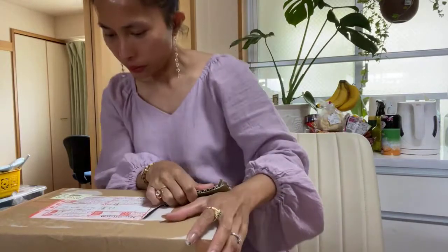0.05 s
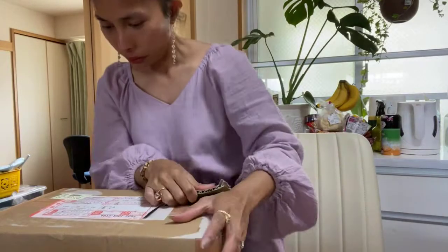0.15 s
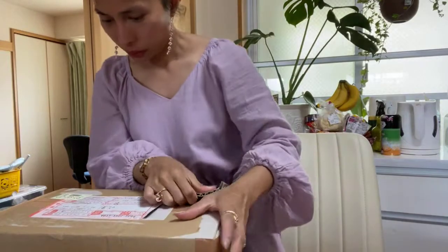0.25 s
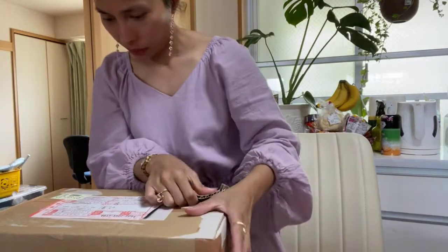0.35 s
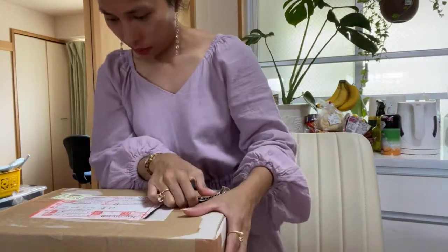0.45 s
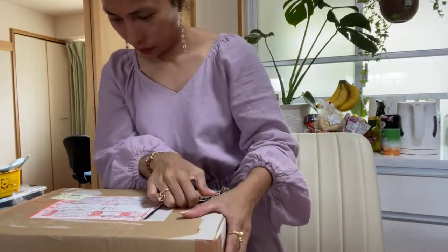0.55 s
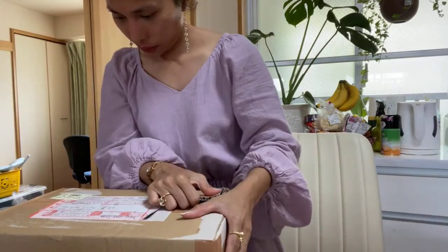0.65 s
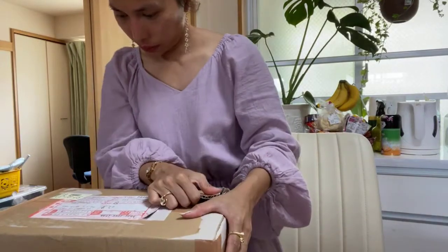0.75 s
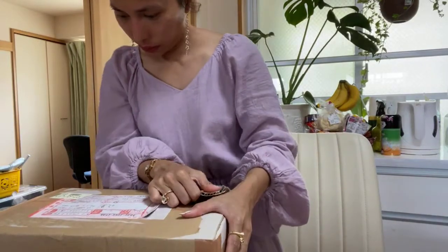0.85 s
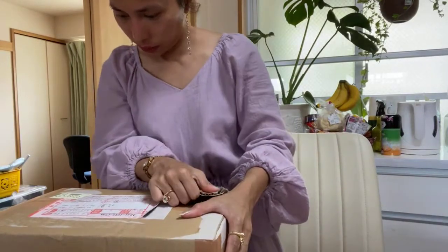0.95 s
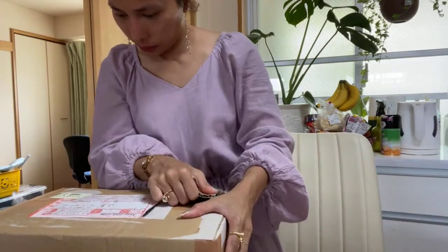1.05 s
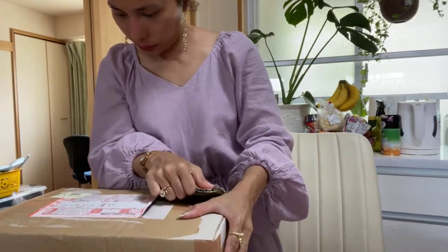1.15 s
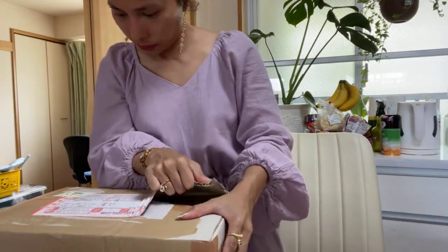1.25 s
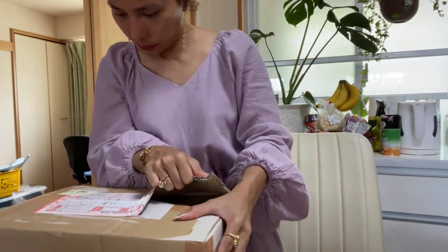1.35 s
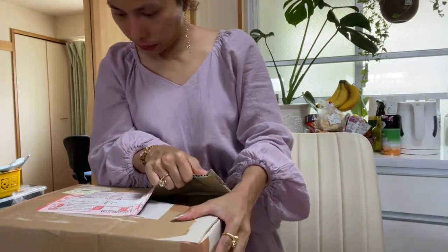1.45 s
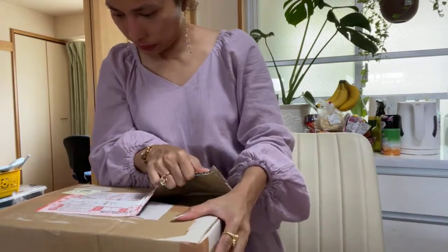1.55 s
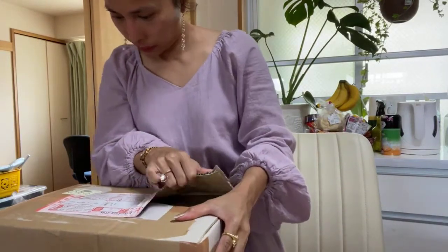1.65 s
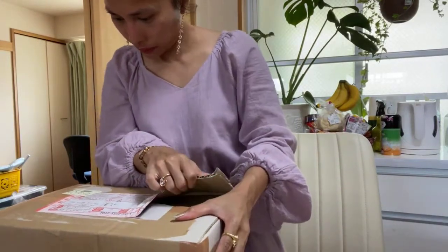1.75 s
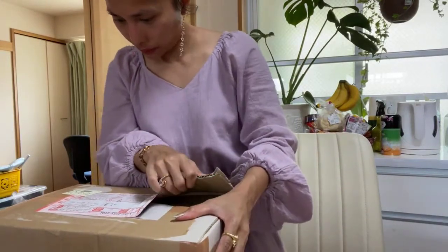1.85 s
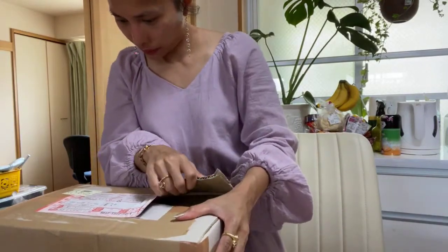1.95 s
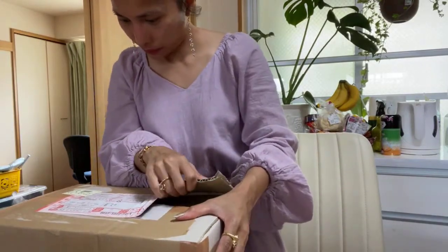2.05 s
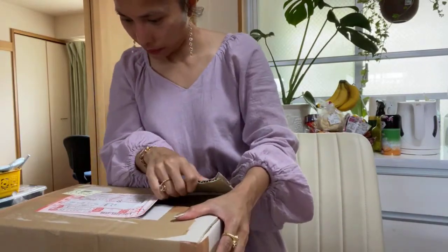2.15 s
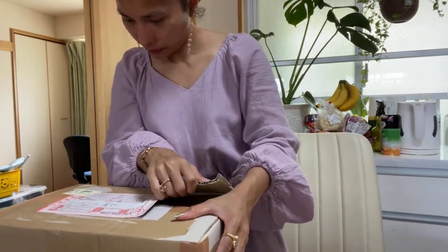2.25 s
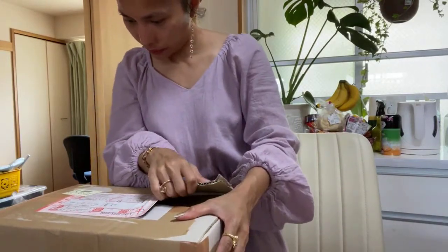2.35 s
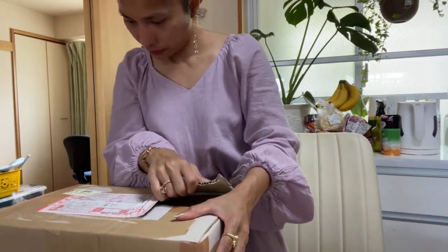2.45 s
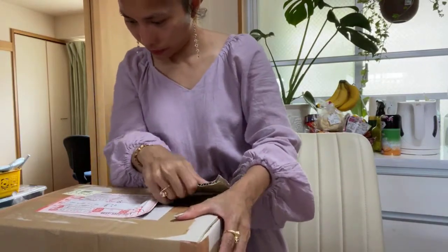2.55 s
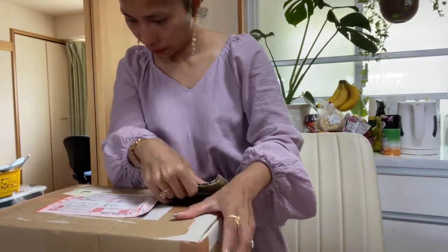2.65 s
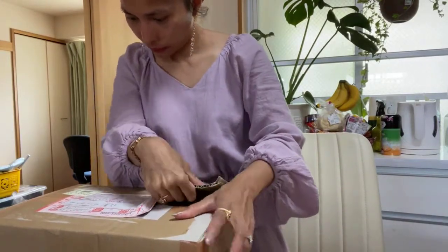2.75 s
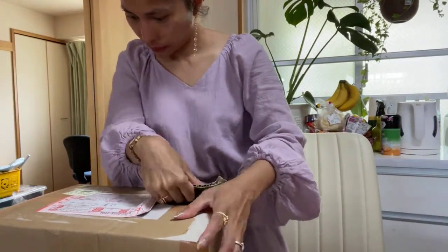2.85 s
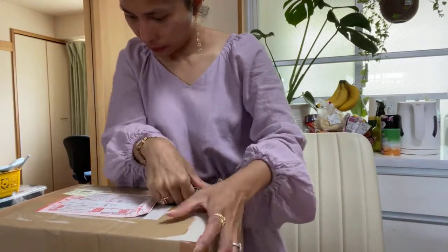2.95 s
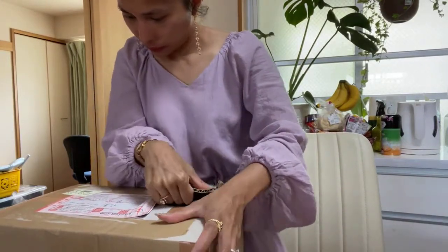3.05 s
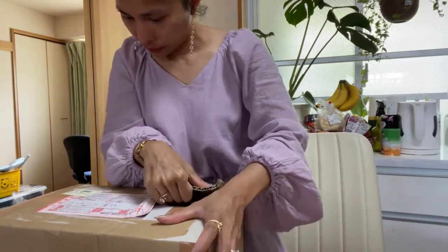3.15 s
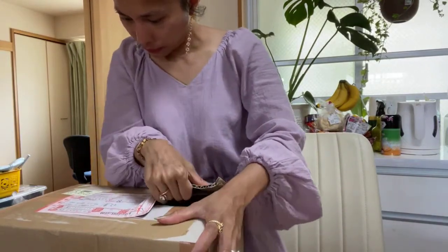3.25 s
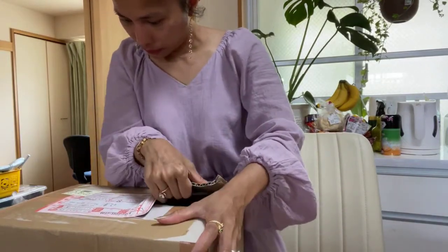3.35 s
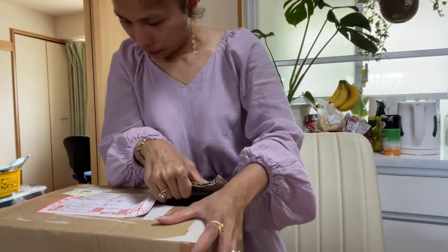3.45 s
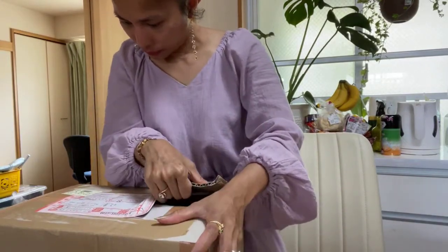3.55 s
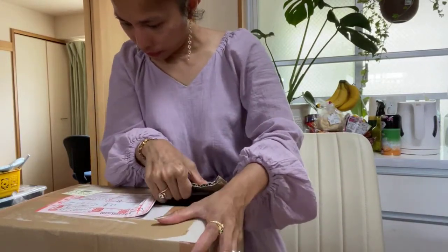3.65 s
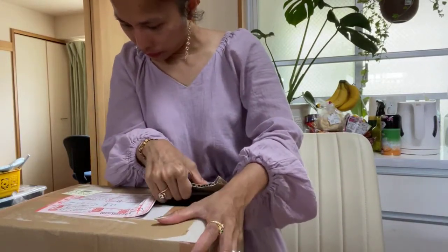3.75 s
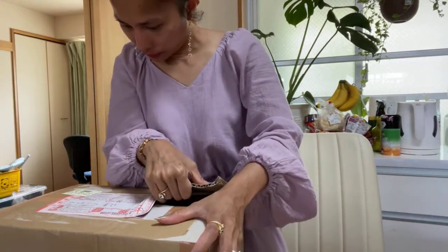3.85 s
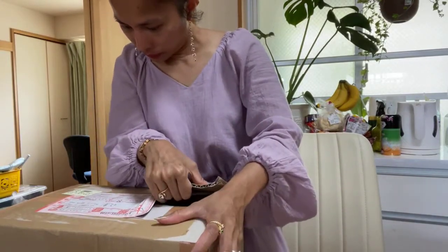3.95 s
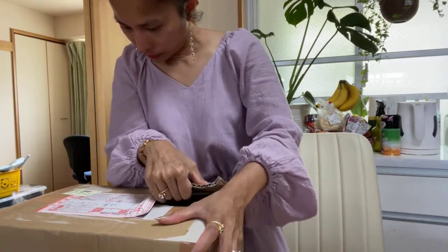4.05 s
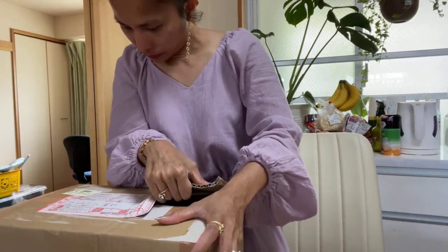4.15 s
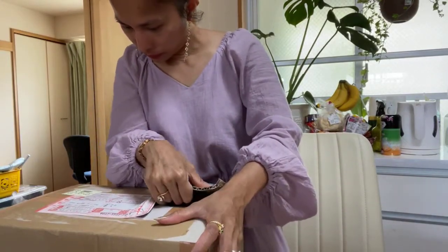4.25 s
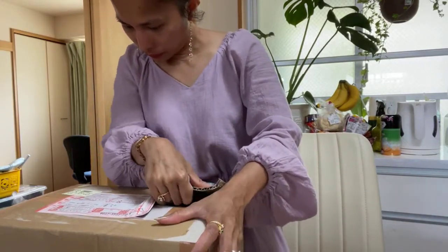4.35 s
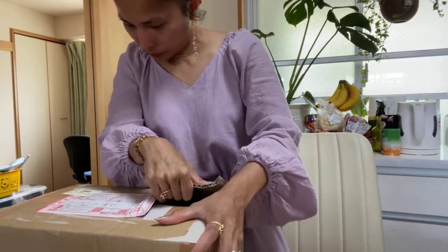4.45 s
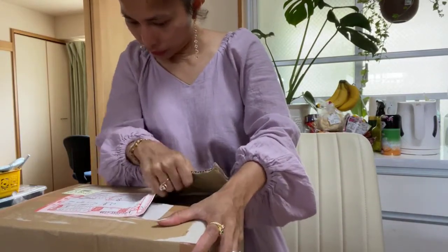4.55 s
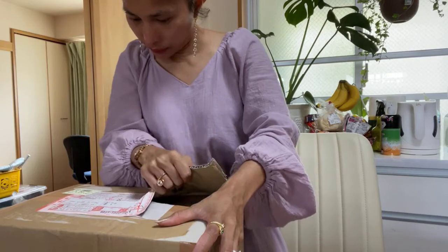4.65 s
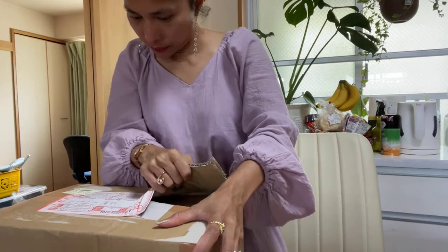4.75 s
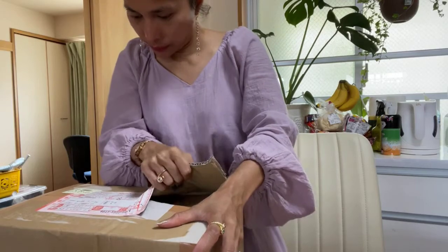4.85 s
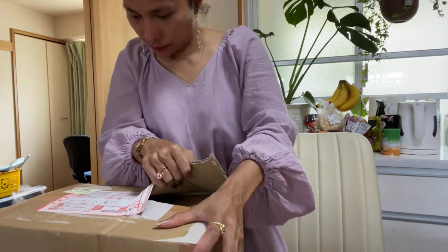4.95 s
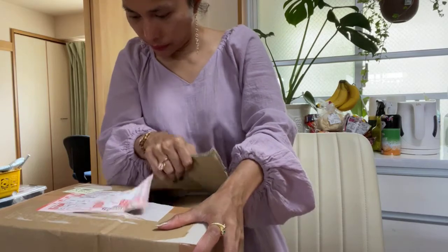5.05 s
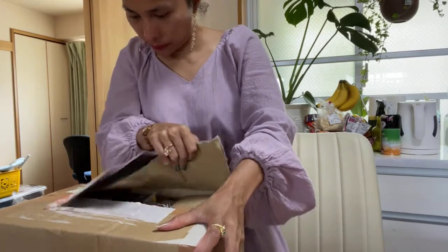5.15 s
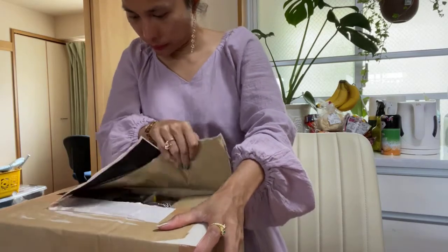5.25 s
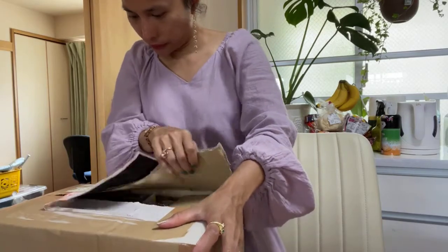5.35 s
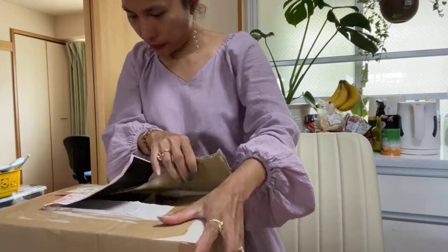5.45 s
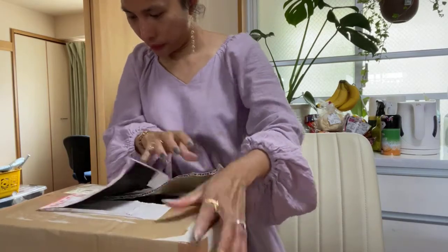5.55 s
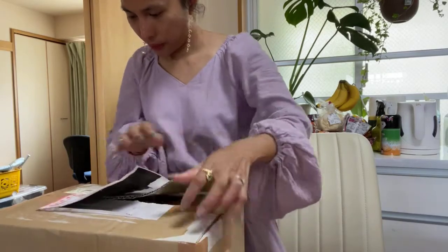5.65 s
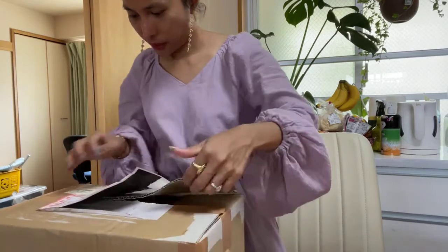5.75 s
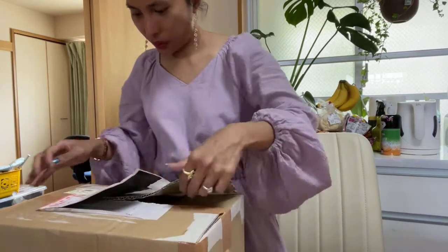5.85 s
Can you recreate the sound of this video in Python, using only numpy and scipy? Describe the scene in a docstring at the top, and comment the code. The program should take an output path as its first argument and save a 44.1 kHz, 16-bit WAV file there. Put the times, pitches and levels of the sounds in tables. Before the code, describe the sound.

Close, dry recording in a small quiet room. Hands softly rub and tick on a cardboard box, then stuck tape lets go in a rapid run of sharp snaps with woody board knocks. Faint scuffs, taps and near quiet follow, before separate cracks speed into a short loud rip with a boxy thud, then rustling and papery ticks.

```python
"""A small room: tape is pulled off a cardboard box, and its glue lets go in single snaps, then in one fast rip.
A snap is a burst of noise spikes plus the damped modes of the board; the rip is dense grains and noise.
Between pulls, hands rub (coloured noise), tick, scuff and bump the box (short bursts and dying modes), and
a flap groans (a wavering tone). Early echoes, a decaying tail and low room tone surround the sounds."""
import sys
import numpy as np
from scipy import signal
from scipy.io import wavfile
from scipy.ndimage import uniform_filter1d

SR = 44100
rng = np.random.default_rng(int(sys.argv[2]) if len(sys.argv) > 2 else 0)


def put_to_file(sound):
    """Save the sound as 16-bit audio at rate SR, in the file named by the first command-line argument."""
    columns = np.atleast_2d(sound).T  # one column per channel
    safe = np.clip(columns, -1, 1)
    whole_steps = np.round(safe * 32767)
    wavfile.write(sys.argv[1], SR, whole_steps.astype(np.int16))


N = 259308

# nominal bending modes of the cardboard: f/Hz, level/dB, t60/s
BOARD_MODES = [(138, -13.5, 0.02), (256, -23, 0.01), (353, -8, 0.041), (444, -4, 0.019), (503, -5.5, 0.018),
               (583, -1.5, 0.012), (672, 3.5, 0.012), (790, -4.5, 0.012), (1010, -6.5, 0.0053),
               (1410, -8.5, 0.0038), (1610, -4, 0.01), (2100, -11.5, 0.008)]
BURST = 24.9  # samples over which a crack's level counts


def gain_of(db):
    """Amplitude ratio from a level: 20 dB for each factor of ten."""
    return 10 ** (np.asarray(db) / 20)


def evened(x):
    """Normalisation to a root-mean-square value of 1."""
    return x / np.sqrt(np.mean(x ** 2) + 1e-20)


def peaked(x):
    """Normalisation to a peak magnitude of 1."""
    return x / abs(x).max()


def read(points, hz):
    """Interpolation along a logarithmic frequency axis."""
    f, value = np.transpose(points)
    return np.interp(np.log(hz + 1), np.log(f + 1), value)


def add(mix, s, sound):
    """Linear superposition of a sound that starts at s seconds."""
    part = mix[round(s * SR):][:len(sound)]
    part += sound[:len(part)]


def follow(rows, lead=0.016):
    """Envelope control: a mask fading in from lead seconds before the start and out past the end, and the curves."""
    s, *columns = np.transpose(rows)
    t = np.arange(N) / SR
    to_edge = np.minimum(t - s[0] + lead, s[-1] + 0.014 - t)
    mask = np.sqrt(np.clip(to_edge / 0.012, 0, 1))
    return mask, *(np.interp(t, s, c) for c in columns)


def colour(x, points):
    """Minimum-phase filtering: the log spectrum fixes the phase, so the response is causal; its energy is 1."""
    level_db = np.maximum(read(points, abs(np.fft.fftfreq(2048, 1 / SR))), -70)
    log_gain = np.log(gain_of(level_db))
    taps = np.fft.ifft(np.exp(np.conj(signal.hilbert(log_gain)))).real[:1024]
    return signal.oaconvolve(x, taps / np.linalg.norm(taps))[:len(x)]


def patchy(x, depth_db, frames, bins):
    """Time-frequency modulation: random patches of time and pitch swell and sink at constant mean power."""
    z = signal.stft(x, nperseg=128, noverlap=96)[2]
    field = rng.standard_normal(z.shape[::-1]).T
    field = uniform_filter1d(field, frames, 1)
    field = evened(uniform_filter1d(field, bins, 0))
    return signal.istft(z * evened(gain_of(depth_db * field)), nperseg=128, noverlap=96)[1][:len(x)]


def ring(hz, t60, rise=0.0007, delay=0):
    """Damped oscillation: one mode with a soft start and exponential decay."""
    t = np.maximum(np.arange(SR // 6) / SR - delay, 0)
    return gain_of(-60 * t / t60) * (1 - np.exp(-t / rise)) * np.sin(2 * np.pi * hz * t)


def board(detune=1, spread_db=0):
    """Modal superposition with dispersion: bending waves of high pitch travel faster, so high modes start first."""
    hz, level_db, t60 = np.transpose(BOARD_MODES)
    travel_s = 0.001  # crossing time of a 1 kHz bending wave over the lid
    total = 0
    for k, (f, db, decay_s) in enumerate(zip(hz * detune, level_db + spread_db, t60)):
        mode = ring(f, decay_s, rise=0.25 / f, delay=travel_s * np.sqrt(1000 / f))
        total = total + (-1) ** k * gain_of(db) * mode
    return total


def stir(x):
    """Modal overlap: steady friction moves over the board, so its modes blur into one smooth colour."""
    # board under friction: f/Hz, relative level/dB
    spectrum = [(150, -28.5), (300, 4), (700, -6), (1200, -5), (2000, -9.5), (4000, -31.5)]
    return colour(x, spectrum)


def grains(per_s, spread_db):
    """Shot noise: sparse clicks of random sign, a few of them large."""
    size = gain_of(spread_db * np.minimum(rng.exponential(1, N), 4)) * rng.choice([-1., 1.], N)
    return evened(size * (rng.random(N) < per_s / SR))


def crack(chance, t60, lag, dull=0.75):
    """Impulsive fracture: sharp spikes as fibres part, then their bounce off the lid with a few late fibres."""
    t = np.arange(chance.shape[1]) / SR
    spikes = chance * abs(chance) ** 0.55
    first, late = spikes * gain_of(-60 * t / t60) * np.minimum(t / 0.00035, 1)
    pole = np.clip(dull, 0, 0.9)  # one-pole low-pass
    bounce = signal.lfilter([1 - pole], [1, -pole], first + 0.71 * late)
    both = first + 0.75 * np.roll(bounce, round(lag * SR)) * (t > lag)
    return both / np.linalg.norm(both) * np.sqrt(BURST)


def paper(hz):
    """Impulsive fracture: one small crack, its spectral peak set by the bit of paper that gives."""
    shape = [(800, -24), (0.7 * hz, -10), (hz, 0), (1.35 * hz, -9), (17000, -20)]
    return colour(crack(rng.standard_normal((2, 700)), 0.0027, 0.0012, dull=0), shape)


def room_tone():
    """Stationary Gaussian noise: a low steady spectrum with drifting patches."""
    # room tone: f/Hz, relative spectral density level/dB
    spectrum = [(15, -47), (25, -7), (70, 0.5), (177, -0.5), (296, -9.5), (358, -3.5), (422, -13),
                (787, -14), (1320, -21.5), (1830, -31), (3230, -32), (11900, -44), (16500, -52.5)]
    level_db, patch_db = -67, 1.5
    frames, hz = N // 256 + 5, np.fft.rfftfreq(1024, 1 / SR)
    a, b, patches = rng.standard_normal((frames, 513, 3)).T
    patches = uniform_filter1d(patches, 10, 0)
    patches = evened(uniform_filter1d(patches, 14, 1))
    z = (a + 1j * b) * gain_of(read(spectrum, hz)[:, None] + patch_db * patches)
    return gain_of(level_db) * evened(signal.istft(z, nperseg=1024, noverlap=768)[1][:N])


def stray_ticks():
    """A Poisson-like process: small chance ticks in six colours of paper."""
    per_s = 40  # all six colours together
    total = np.zeros(N)
    for hz in np.geomspace(2200, 8000, num=6):
        hits = (rng.random(N) < per_s / 6 / SR) * gain_of(3.2 * rng.standard_normal(N))
        total += signal.oaconvolve(hits, paper(hz))[:N]
    return total


def rubbing():
    """Sliding friction: skin gives fluttering hiss and scrape with stray ticks, and stirs the board and inner air."""
    # hands sliding on the board, one table a spell: t/s, hiss level/dB, scrape level/dB, board level/dB
    spells = [
        [(0.0, -75, -67.5, -64.5), (0.1, -68, -65.5, -59.5), (0.19, -68, -68, -66), (0.235, -59, -61, -66.5),
         (0.265, -61, -62, -64), (0.29, -57.5, -52, -56), (0.368, -66.5, -69, -67), (0.46, -76, -72.5, -72.5),
         (0.524, -78, -80, -82), (0.6, -69, -75, -67.5), (0.678, -89, -74.5, -64.5), (0.8, -78.5, -83, -71.5),
         (0.922, -74, -77.5, -72), (1.02, -71, -77, -68.5)],
        [(1.4, -64, -60.5, -65), (1.492, -99, -70.5, -57), (1.604, -91, -69.5, -64.5), (1.742, -77, -76, -73.5),
         (1.82, -102, -98, -78)],
        [(2.43, -84, -80.5, -70), (2.478, -60, -61.5, -57), (2.53, -78, -71, -65), (2.59, -69.5, -72, -68),
         (2.63, -74, -65.5, -59.5), (2.675, -72, -69, -63), (2.69, -67, -62, -58), (2.73, -65, -62, -62),
         (2.76, -71, -67, -62.5), (2.812, -77, -70, -64), (2.89, -72, -71, -65.5), (2.93, -65, -66, -63),
         (3.005, -66.5, -65, -63.5), (3.03, -74, -71, -65.5), (3.08, -83, -74, -68),
         (3.145, -76.5, -76.5, -70.5), (3.17, -91, -84.5, -79), (3.25, -95, -86.5, -81)],
        [(4.12, -92, -91.5, -79.5), (4.234, -92, -81.5, -70.5), (4.374, -85.5, -86, -73),
         (4.47, -76, -70.5, -68), (4.51, -74, -64, -65), (4.544, -77, -64.5, -60), (4.61, -85, -68, -55.5),
         (4.675, -65, -70, -61)],
        [(5.2, -73, -67, -47.5), (5.262, -61, -55, -50.5), (5.325, -71, -67, -65), (5.345, -72, -59, -52),
         (5.385, -71, -70, -66), (5.42, -66, -58, -55.5), (5.445, -55, -55, -46.5), (5.485, -63, -48, -48),
         (5.51, -62, -61.5, -53), (5.565, -69, -67.5, -64.5), (5.62, -62, -65, -66), (5.68, -78, -73, -64),
         (5.74, -70.5, -68, -61.5), (5.8, -85.5, -86, -89), (5.88, -88, -80, -63)],
    ]
    # hiss: f/Hz, relative level/dB
    hiss_spectrum = [(2500, -20.5), (4500, -10), (6500, 1), (8000, -2.5), (10000, -3), (15200, -11.5),
                     (15900, -5.5), (16500, -33)]
    # scrape: f/Hz, relative level/dB
    scrape_spectrum = [(700, -15.5), (1400, -1.5), (2600, -1), (4500, -2), (6500, -8), (10000, -22)]
    stray_db, hollow_db = 1.5, -3  # relative to the scrape; air in the box, relative to the board
    flutter = gain_of(0.98 * evened(uniform_filter1d(rng.standard_normal(N), 400)))
    grit = rng.standard_normal(N) + 0.55 * grains(700, 5.2)
    skin = patchy(evened(flutter * grit), depth_db=2.5, frames=16, bins=5)
    hiss = colour(np.roll(skin, shift=64), hiss_spectrum)
    scrape = colour(skin, scrape_spectrum) + gain_of(stray_db) * stray_ticks()
    hollow = evened(signal.oaconvolve(skin, ring(169, 0.015))[:N])
    body = stir(skin) + gain_of(hollow_db) * hollow
    out = np.zeros(N)
    for mask, hiss_db, scrape_db, board_db in map(follow, spells):
        out += mask * (gain_of(hiss_db) * hiss + gain_of(scrape_db) * scrape + gain_of(board_db) * body)
    return out


def bumps():
    """Impulse response: a soft hand bump sounds two damped low partials of the box."""
    # hand on the box: t/s, peak level/dB, f/Hz
    blows = [(0.106, -45, 151), (0.549, -51.5, 145), (0.952, -52, 344), (1.632, -54, 153),
             (2.492, -40.5, 95.7), (2.628, -48, 103), (2.702, -57, 200), (2.779, -52, 121.2),
             (4.245, -55, 139.1), (4.49, -53, 250), (4.601, -42, 146), (4.62, -37, 138),
             (5.043, -23.5, 157), (5.167, -29.5, 226), (5.487, -33.5, 158.4), (5.75, -48.5, 123)]
    t60 = 0.055  # s
    out = np.zeros(N)
    for s, db, hz in blows:
        thud = ring(hz, t60, 0.0026) + 0.59 * ring(1.6 * hz, 0.66 * t60, 0.0022)
        add(out, s, gain_of(db) * peaked(thud))
    return out


def scuffs():
    """Band-limited friction noise: each short dull scuff is a decaying puff of uneven grit."""
    # scuffs: t/s, peak level/dB, centre f/Hz, relative treble level/dB, t60/s
    strokes = [(0.275, -39.5, 3020, -8, 0.08), (0.108, -43, 390, -17.5, 0.17),
               (0.549, -45.5, 540, -10, 0.15), (0.868, -76, 710, -25, .12), (1.628, -55, 900, -8, 0.34),
               (1.84, -62, 4250, -8, 0.16), (1.955, -54.5, 801, -4, 0.16), (2.092, -47, 1082, -15, 0.14),
               (2.351, -57, 3600, -4, 0.16), (4.248, -48, 800, -14.5, 0.05), (2.19, -52, 1300, -23, 0.2),
               (2.341, -57.5, 1120, -34.5, 0.12), (2.792, -43, 1510, -45, 0.014),
               (2.862, -39.5, 730, -13, 0.02), (3.389, -57, 1000, -29, 0.15),
               (2.204, -56.5, 2056, -13.5, 0.1), (2.309, -68.5, 3080, -23.5, 0.12),
               (2.392, -70, 3100, -25, 0.08), (3.633, -57.5, 850, -27, 0.11), (3.711, -59, 1345, -24, 0.12),
               (3.867, -60.5, 983, -25, 0.14), (4.181, -57, 872, -20.5, 0.11),
               (4.336, -57, 655, -22.5, 0.063), (4.49, -45, 656, -15, 0.35), (5.344, -46, 795, -19, 0.077),
               (5.739, -49, 706, 4, 0.048)]
    out, t = np.zeros(N), np.arange(SR // 6) / SR
    for s, db, hz, treble_db, t60 in strokes:
        unevenness = evened(uniform_filter1d(rng.standard_normal(len(t)), size=80))
        grit = rng.standard_normal(len(t)) * gain_of(3.4 * unevenness)
        puff = grit * gain_of(-60 * t / t60) * np.minimum(t / 0.0029, 1)
        low, top, knee, high = hz * np.array([0.55, 0.92, 1.1, 1.9])
        shape = [(low, -20), (top, 0), (knee, -2), (high, treble_db), (16000, 1.6 * treble_db - 9.5)]
        add(out, s, gain_of(db) * peaked(colour(puff, shape)))
    return out


def ticks():
    """Position-dependent modal excitation: a fingertip stirs mostly the modes near its spot's pitch."""
    # fingers and paper: t/s, crack level/dB, crack colour f/Hz, board tap level/dB, spot's pitch f/Hz
    touches = [(0.1151, -40.5, 2220, -47, 533), (0.2488, -43, 4270, -58, 462), (0.39, -53, 4550, -55, 670),
               (0.709, -55, 4150, -51.5, 483), (0.7474, -52.5, 4200, -59, 880),
               (0.919, -61.5, 9000, -66, 700), (0.938, -58, 10100, -76, 700),
               (0.952, -63.5, 7100, -75, 700), (0.993, -59, 10000, -74, 700), (1.016, -61, 8000, -70, 700),
               (1.433, -54, 3120, -62, 654), (1.475, -67, 11000, -72, 700), (1.517, -57, 7000, -61, 700),
               (1.559, -49, 3000, -48, 1630), (1.6356, -54, 4230, -50, 1090),
               (1.706, -60.5, 6000, -72, 696), (1.966, -55.5, 3580, -54.5, 578),
               (2.0985, -39, 5870, -48.5, 1060), (2.1085, -43.5, 4440, -57, 538),
               (2.359, -52.5, 3230, -62.5, 557), (2.44, -56, 5940, -62.5, 804),
               (2.465, -46.5, 6500, -70, 520), (2.475, -43, 4980, -55, 445), (2.511, -49, 4780, -60, 1370),
               (2.6387, -53, 4430, -54, 524), (2.687, -49.5, 6500, -61, 900), (2.7017, -49, 6560, -56, 665),
               (2.7688, -50, 4650, -52, 444.5), (2.7918, -46, 4860, -45.5, 506),
               (2.849, -59, 5500, -68, 800), (2.868, -56, 5370, -52, 1450), (2.915, -56.5, 4500, -67, 800),
               (2.99, -54.5, 5000, -69, 900), (3.714, -65.5, 3200, -64.5, 1302),
               (4.037, -70.5, 4980, -74, 800), (4.221, -66.5, 4980, -69.5, 800),
               (4.2507, -53, 5350, -53, 820), (4.514, -41, 6600, -56, 613), (4.578, -48, 2740, -48, 1660),
               (4.605, -50.5, 2680, -40, 450), (4.6213, -57, 2610, -47, 460),
               (4.669, -53.5, 7940, -64, 700), (5.2206, -36.5, 3440, -47, 580),
               (5.256, -44, 5500, -47, 605), (5.2857, -43.5, 7700, -47, 1600),
               (5.341, -47, 3500, -52, 1000), (5.3487, -40.5, 6550, -48, 836),
               (5.354, -50, 11000, -56, 800), (5.4196, -50, 2000, -46, 1380), (5.457, -36, 7400, -44, 1100),
               (5.471, -44, 9000, -58, 1500), (5.476, -44, 6300, -35, 1340), (5.488, -33, 7350, -45, 460),
               (5.5129, -44, 2010, -43, 1768), (5.55, -51, 2500, -60, 995), (5.6287, -53, 7600, -65, 1520),
               (5.699, -43, 2860, -51.5, 706), (5.855, -58.5, 5500, -59.5, 772)]
    fall_db = 20.5  # per octave away from the spot's pitch
    out = np.zeros(N)
    for s, crack_db, paper_hz, tap_db, spot_hz in touches:
        add(out, s, gain_of(crack_db) * paper(paper_hz))
        octaves = abs(np.log2(np.transpose(BOARD_MODES)[0] / spot_hz))
        add(out, s, gain_of(tap_db) * peaked(board(spread_db=-fall_db * octaves)))
    return out


def snaps():
    """Sudden energy release: glue cracks and knocks the board; the walls hear plainer clicks than the near mic."""
    # glue letting go: t/s, crack level/dB, board knock level/dB, deep modes' change/dB, high modes' change/dB
    releases = [(1.0354, -15, -20.5, 0.5, 6), (1.063, -36, -39.5, -0.5, -0.5),
                (1.0682, -13, -17.5, 7.5, 3.5), (1.0784, -14.5, -13, -2, 0), (1.0805, -17.5, -21, -5, 1.5),
                (1.0894, -13.5, -13, -0.5, -7), (1.1089, -13.5, -19.5, -1, -2), (1.111, -20.5, -17, 1, 3),
                (1.1457, -16, -12, -7, -3.5), (1.1849, -16, -6.5, -6, -7), (1.1887, -15.5, -15, -5.5, 0),
                (1.1929, -14.5, -10.5, 0, -4), (1.1968, -20, -20, -4, 2.5), (1.202, -21, -17, 3, -4),
                (1.22, -20, -17.5, 3, -5.5), (1.2234, -17.5, -16.5, -7.5, 3.5),
                (1.227, -16.5, -14.5, -1.5, 2), (1.233, -16, -15.5, -3, 0.5),
                (1.248, -16.5, -10.5, 1.5, -6.5), (1.2507, -15, -14.5, 1, -2),
                (1.265, -14.5, -21, 4.5, 1.5), (1.322, -16, -24, 9, 11.5), (4.6855, -17.5, -15, -1, 0.5),
                (4.7796, -16, -16, 5, 0.5), (4.8214, -20.5, -16.5, -3, -4.5), (4.893, -17, -13, -7.5, -3),
                (4.9085, -14, -13, -6, -10.5), (4.912, -25.5, -21.5, 1, -1), (4.924, -24, -19, -1.5, -3.5),
                (4.9512, -20.5, -20.5, -4.5, 1), (4.9602, -24.5, -22, 0.5, -1),
                (4.9814, -18, -15.5, -3.5, -3), (4.9862, -23.5, -23.5, 0, 3.5),
                (4.9904, -18.5, -24, 7.5, -2), (4.9939, -17.5, -19, 0.5, 1.5), (4.998, -19, -18.5, 3, -2.5),
                (5.0035, -29, -27.5, -0.5, -1), (5.0093, -17.5, -19, -2.5, 4.5),
                (5.0174, -12, -28, -0.5, 8.5), (5.0237, -14, -20.5, 2.5, 12.5), (5.041, -25, -24, -3, 10),
                (5.052, -17, -19.5, 5, -3), (5.0901, -19.5, -13.5, -0.5, -18), (5.114, -26, -40, -9, -5),
                (5.143, -30, -40, -6, 4), (5.169, -22, -18, -14, -7)]
    # crack: f/Hz, relative level/dB
    crack_spectrum = [(450, -27), (900, -13), (1300, -12), (2000, -8), (2730, -8.5), (3670, -4.5),
                      (4310, -6), (5380, -3), (8630, -5.5), (11000, -4), (14600, -8), (16100, -26.5),
                      (16800, -35.5)]
    # a snap as the walls return it: f/Hz, relative level/dB
    far_spectrum = [(88, -36.5), (150, -4.5), (434, -2), (2550, -18), (2870, -13), (3560, -15.5),
                    (7810, -17.5), (15000, -29), (16500, -40.5)]
    deep_hz, high_hz = 480, 950  # deep modes lie below, high modes above
    bright, low, clicks = np.zeros((3, N))
    hz = np.transpose(BOARD_MODES)[0]
    for s, crack_db, knock_db, deep_db, high_db in releases:
        chance = rng.standard_normal((2, 300))
        lag = 0.0011 + 0.00005 * rng.standard_normal()  # s
        add(bright, s, gain_of(crack_db) * crack(chance, 0.0042, lag))
        add(clicks, s, gain_of([crack_db]) * np.sqrt(BURST))
        # the spot struck changes the pitch and balance of the modes
        detune = 1 + 0.05 * rng.standard_normal(len(hz))
        balance_db = deep_db * (hz < deep_hz) + high_db * (hz > high_hz)
        balance_db = balance_db + 0.92 * rng.standard_normal(len(hz))
        add(low, s, gain_of(knock_db) * board(detune, balance_db))
    near = colour(bright, crack_spectrum) + low
    far = gain_of(1.5) * colour(clicks, far_spectrum) + 0.13 * low
    return near, far


def groan():
    """Frequency modulation: the flap groans as it springs back, a wavering tone with a weak octave."""
    # groan of the flap: t/s, mean level/dB, mean f/Hz
    glide = [(1.47, -71, 233), (1.488, -53, 253), (1.51, -49, 198), (1.528, -49, 206.5), (1.57, -87, 184)]
    mask, db, hz = follow(glide)
    shake = evened(uniform_filter1d(rng.standard_normal((2, N)), size=220))
    phase = 2 * np.pi * np.cumsum(hz * (1 + 0.053 * shake[0])) / SR
    tone = np.sqrt(2) * (np.sin(phase) + 0.15 * np.sin(2 * phase))
    return mask * gain_of(db + 2.5 * shake[1]) * tone


def rip():
    """Merged impulses: snaps too close to tell apart, in uneven jerks; the box booms under the pull."""
    # the fast rip: t/s, crackle level/dB, board level relative to the crackle/dB
    pull = [(5.006, -18, -11), (5.014, -18, -5), (5.024, -18.5, -15), (5.03, -22, -4), (5.038, -22.5, -4.5),
            (5.046, -21.5, -9), (5.058, -19.5, -11.5), (5.065, -24, -6.5), (5.075, -24, -6.5),
            (5.084, -25.5, -2.5), (5.093, -30, -8), (5.101, -29, -8), (5.12, -28, -14), (5.128, -24.5, -14),
            (5.134, -22.5, -2.5), (5.142, -22.5, -11), (5.15, -22, 3), (5.16, -37, -12), (5.185, -46.5, 6),
            (5.23, -84, -2)]
    # crackle: f/Hz, relative level/dB
    crackle_spectrum = [(240, -28), (400, -15.5), (703, 3.5), (875, -10.5), (1060, -7), (2340, -6.5),
                        (2780, -10.5), (3410, -3.5), (7580, -10), (15300, -18), (16100, -36.5),
                        (16800, -99.5)]
    boom_db = -12  # relative to the crackle
    mask, crackle_db, board_db = follow(pull, lead=0)
    jerks = gain_of(1.8 * evened(uniform_filter1d(rng.standard_normal(N), 90)))
    fibres = evened(jerks * (grains(3500, 2.3) + 0.5 * rng.standard_normal(N)))
    fibres = patchy(fibres, depth_db=3.0, frames=7, bins=5)
    boom = evened(signal.oaconvolve(rng.standard_normal(N), np.diff(ring(160, 0.021)))[:N])
    body = gain_of(board_db) * stir(fibres) + gain_of(boom_db) * boom
    return mask * gain_of(crackle_db) * (colour(fibres, crackle_spectrum) + body)


def echoes(x):
    """Specular reflection: the first single returns, a little dulled."""
    # table top and near walls: delay t/s, level/dB
    returns = [(0.0036, -19.5), (0.0074, -17.5), (0.0112, -20), (0.0152, -20), (0.019, -21)]
    # what a near surface gives back: f/Hz, relative level/dB
    surface = [(200, -0.5), (3000, -1), (8000, -2.5), (14000, -11.5)]
    taps = np.zeros(SR // 20)
    for k, (s, db) in enumerate(returns):
        add(taps, s, (-1) ** k * gain_of([db]))
    return colour(signal.oaconvolve(x, taps)[:N], surface)


def room(x):
    """Diffuse reverberation: sparse random taps decay at each band's rate; three tails take turns at equal power."""
    # decay of the room: f/Hz, t60/s
    decay = [(150, 0.19), (400, 0.16), (1000, 0.19), (3000, 0.16), (8000, 0.13), (16000, 0.19)]
    late_db, late_t60 = -15, 0.45  # dB, s: a fainter, longer tail from the rest of the home
    out, at = np.zeros(N), np.arange(240, SR // 2 - 20, 10)
    for k in range(3):
        taps = np.zeros(SR // 2)
        taps[at + rng.integers(0, 10, len(at))] = rng.choice([-1., 1.], len(at))
        hz, t, z = signal.stft(taps, SR, nperseg=128)
        main = gain_of(-60 * t / read(decay, hz)[:, None])
        late = gain_of(late_db - 60 * t / late_t60)
        tail = signal.istft(z * np.hypot(main, late), SR, nperseg=128)[1]
        turn = np.sqrt(2 / 3) * np.cos(np.pi * (7 * np.arange(N) / SR + k / 3))
        out += signal.fftconvolve(x * turn, tail / np.linalg.norm(tail))[:N]
    return out


def scene():
    """Superposition of direct sounds, reflected sound and room tone."""
    rip_wet_db, hands_wet_db, snap_wet_db = -11, -9.5, -7.5  # send to the room's tail
    hands = bumps() + scuffs() + ticks() + groan()
    (near, far), tear = snaps(), rip()
    sent = gain_of(snap_wet_db) * far + gain_of(rip_wet_db) * tear + gain_of(hands_wet_db) * hands
    walls = patchy(room(sent) + echoes(near), depth_db=3.5, frames=24, bins=2)
    return (near + tear + hands + walls + rubbing() + room_tone())[None]


def record(dry):
    """Band limits and soft saturation: the microphone drops deep bass and rounds off peaks; then treble is cut."""
    ceiling, edge_hz = 0.7, 16500  # ceiling as a share of full scale
    thin = signal.sosfilt(signal.butter(4, 65, "high", fs=SR, output="sos"), dry)
    rounded = ceiling * np.tanh(thin / ceiling)
    low_pass = signal.firwin(255, edge_hz, window=("kaiser", 9), fs=SR)
    return signal.oaconvolve(rounded, low_pass[None], "same")


dry = scene()
out = record(dry)
put_to_file(out)
```